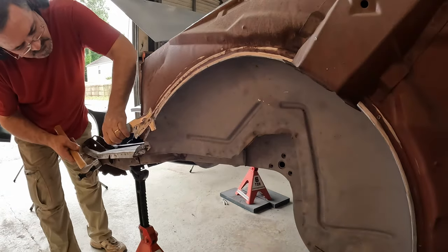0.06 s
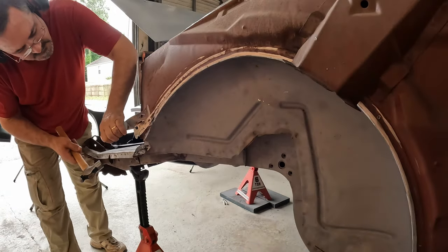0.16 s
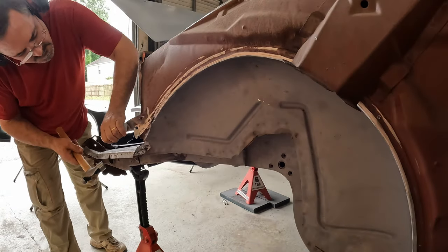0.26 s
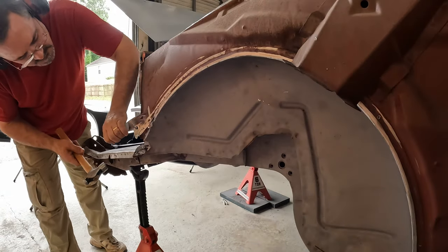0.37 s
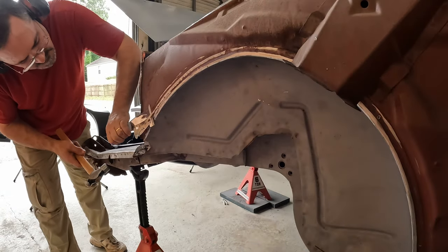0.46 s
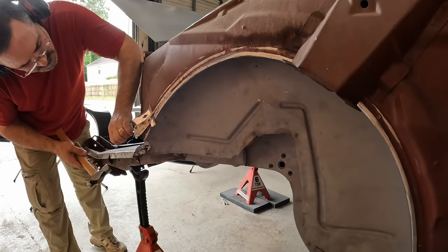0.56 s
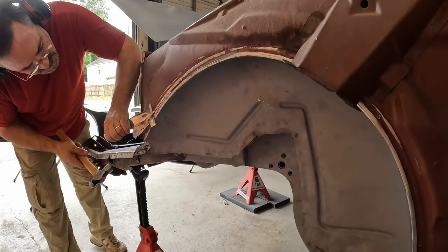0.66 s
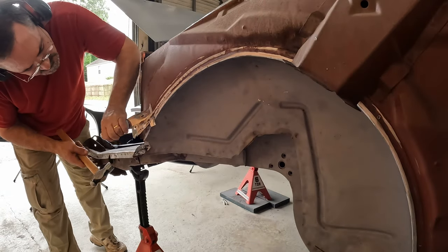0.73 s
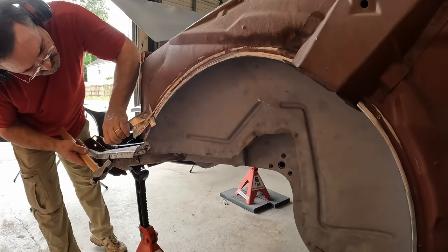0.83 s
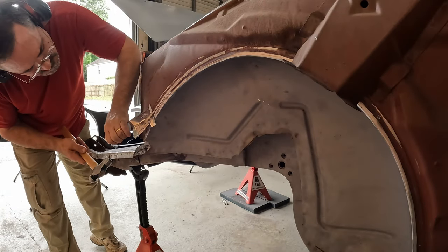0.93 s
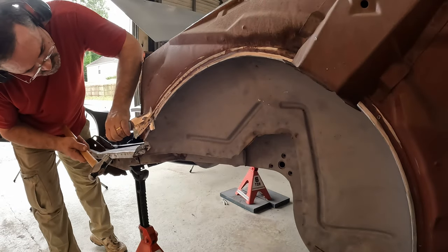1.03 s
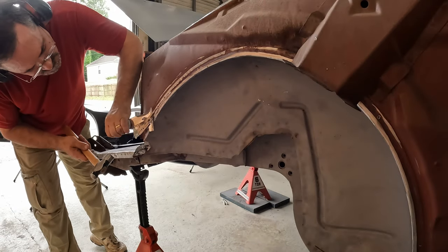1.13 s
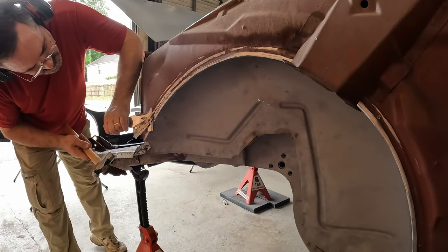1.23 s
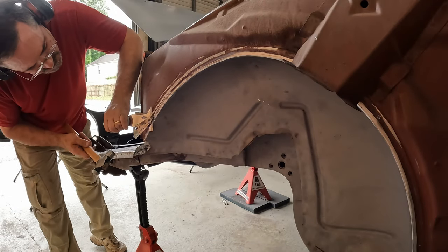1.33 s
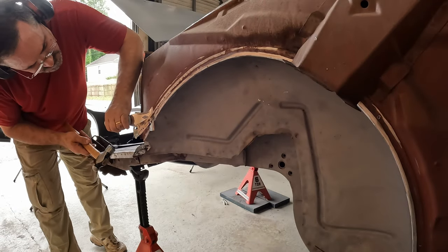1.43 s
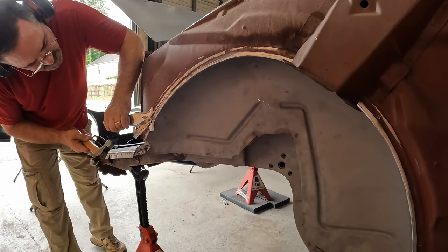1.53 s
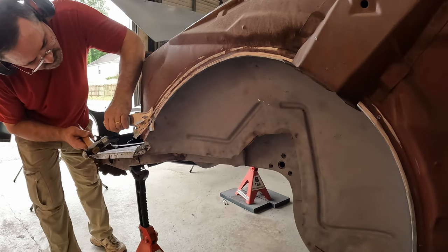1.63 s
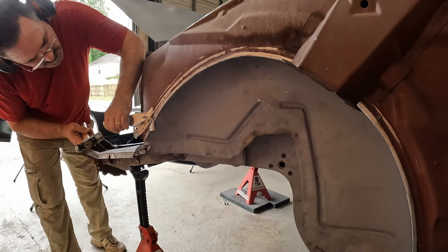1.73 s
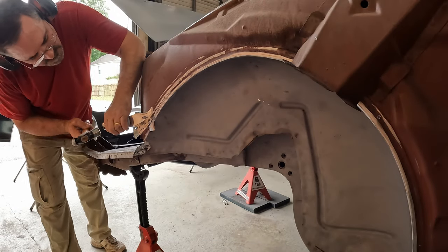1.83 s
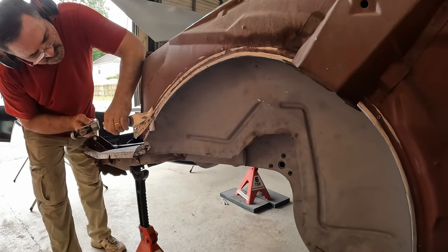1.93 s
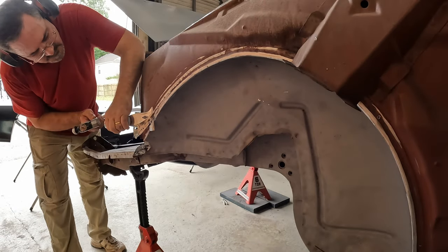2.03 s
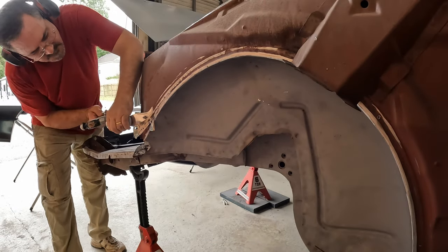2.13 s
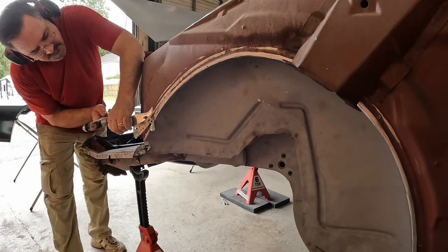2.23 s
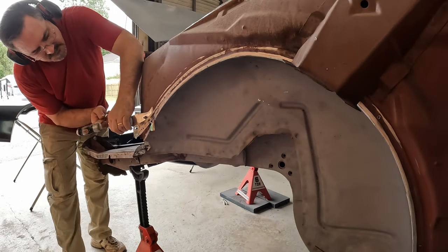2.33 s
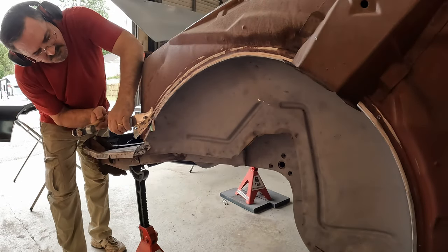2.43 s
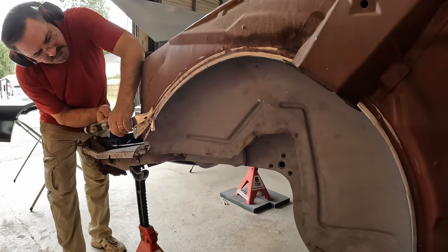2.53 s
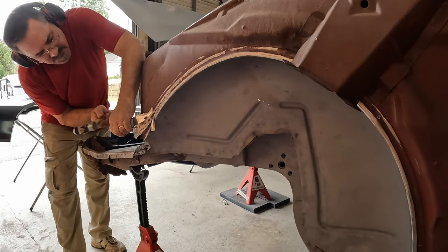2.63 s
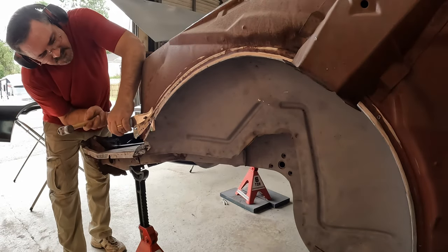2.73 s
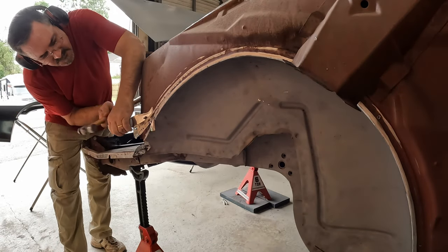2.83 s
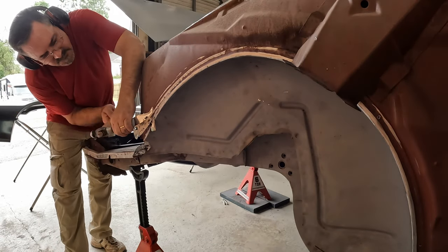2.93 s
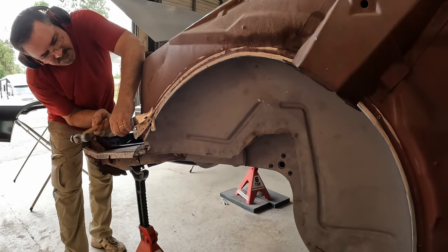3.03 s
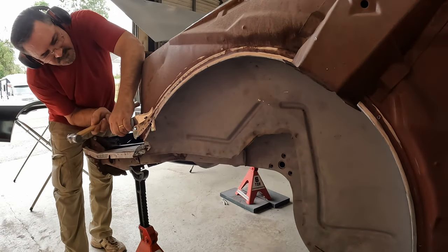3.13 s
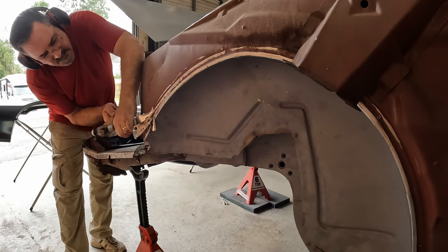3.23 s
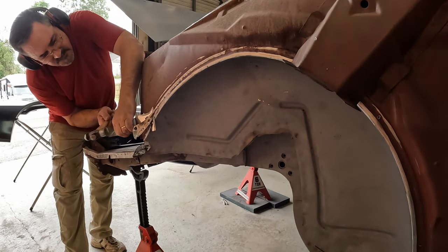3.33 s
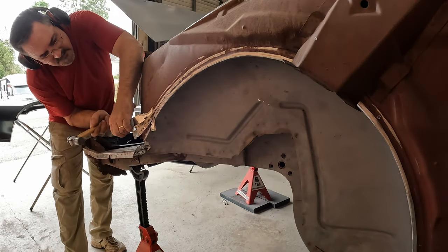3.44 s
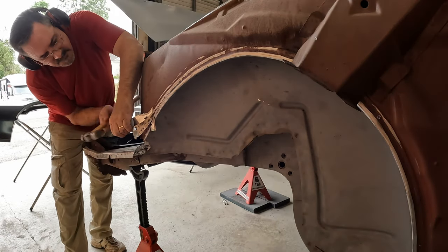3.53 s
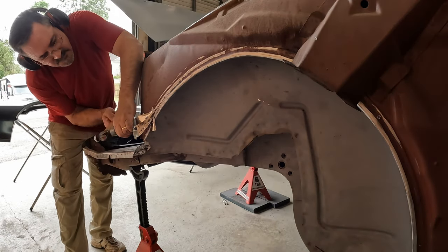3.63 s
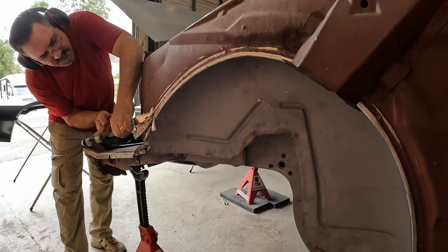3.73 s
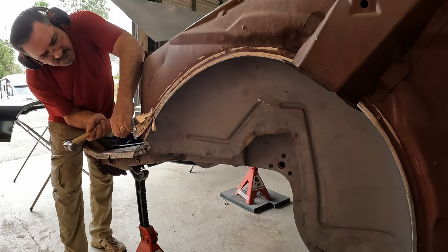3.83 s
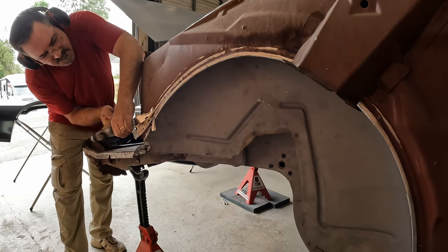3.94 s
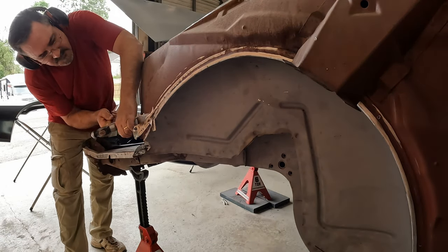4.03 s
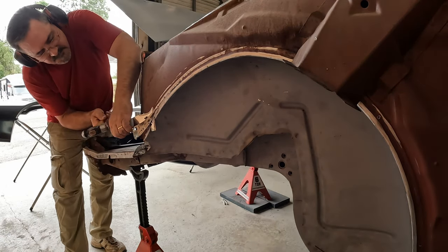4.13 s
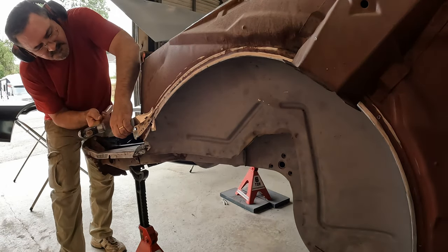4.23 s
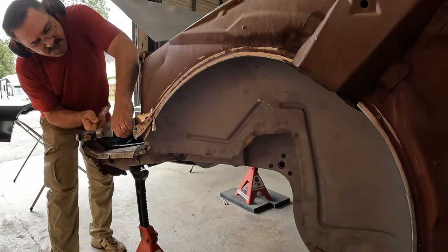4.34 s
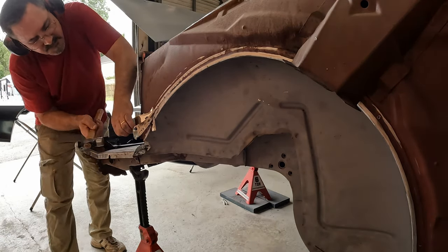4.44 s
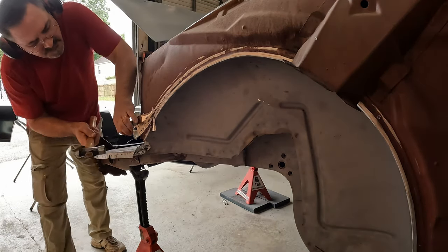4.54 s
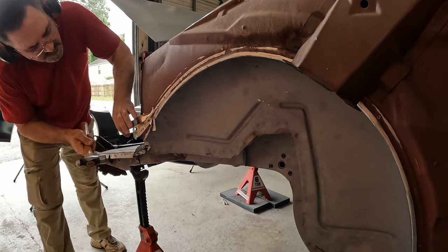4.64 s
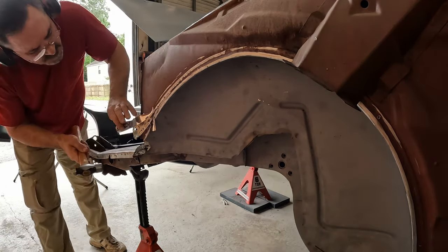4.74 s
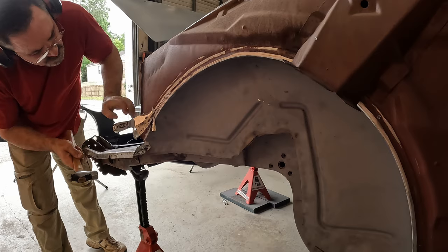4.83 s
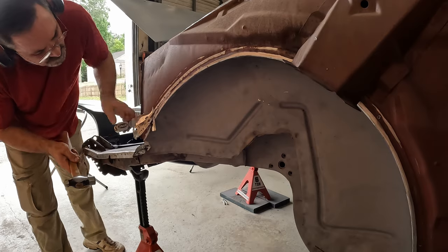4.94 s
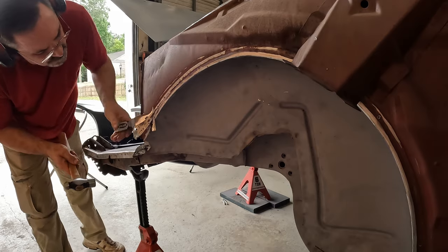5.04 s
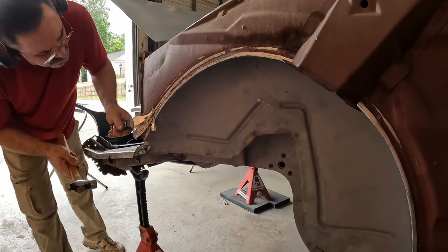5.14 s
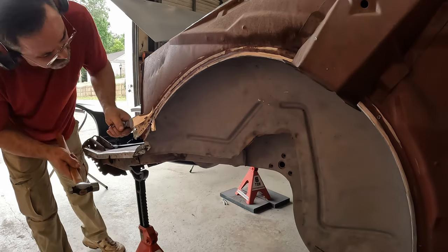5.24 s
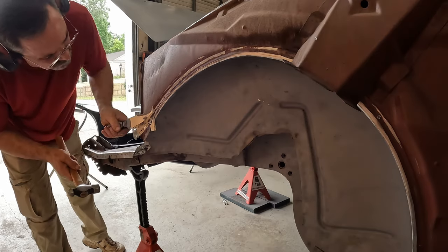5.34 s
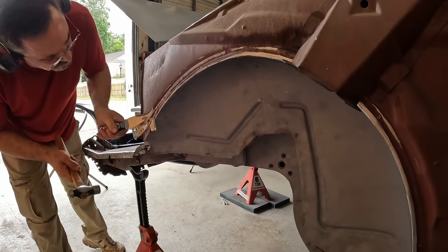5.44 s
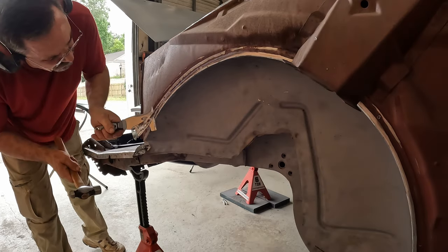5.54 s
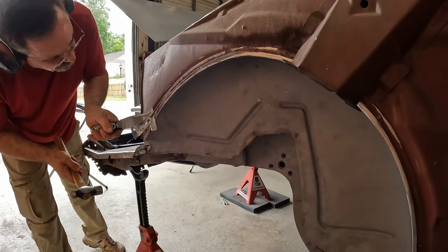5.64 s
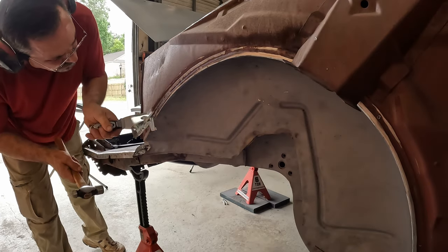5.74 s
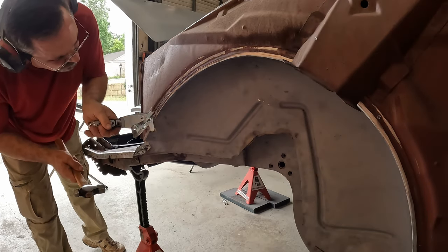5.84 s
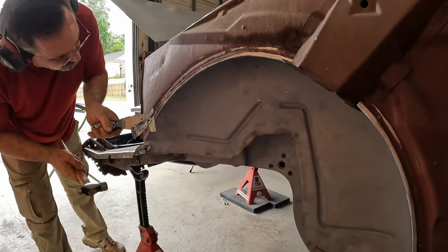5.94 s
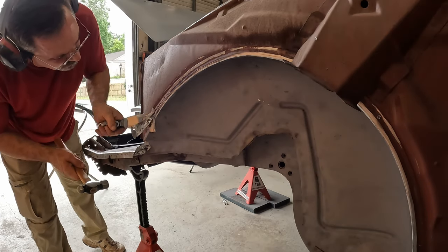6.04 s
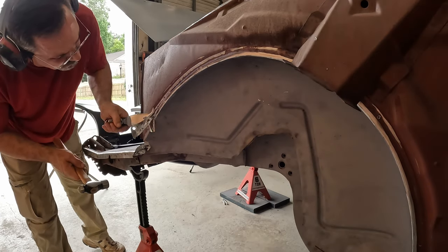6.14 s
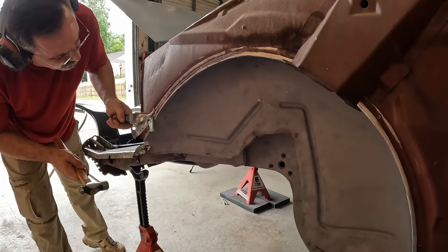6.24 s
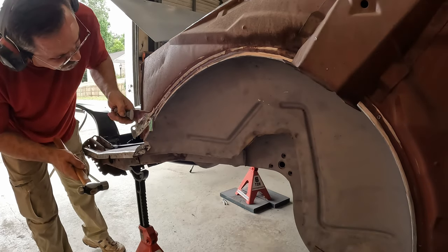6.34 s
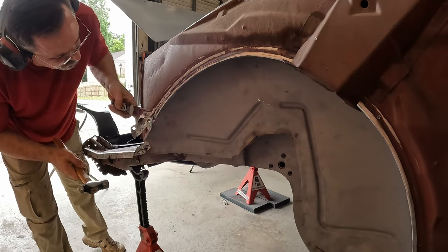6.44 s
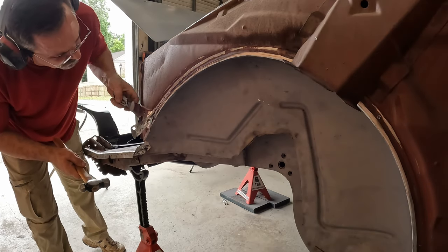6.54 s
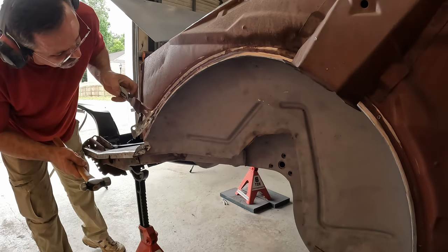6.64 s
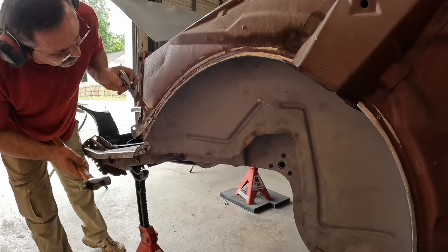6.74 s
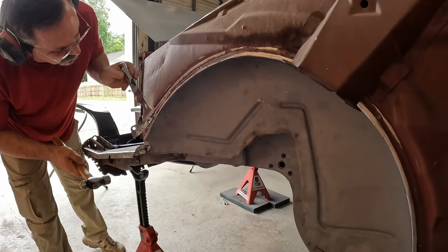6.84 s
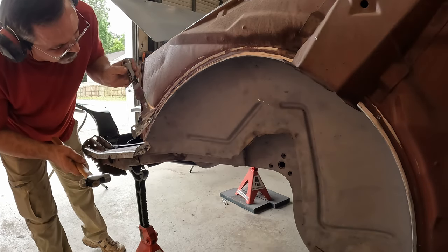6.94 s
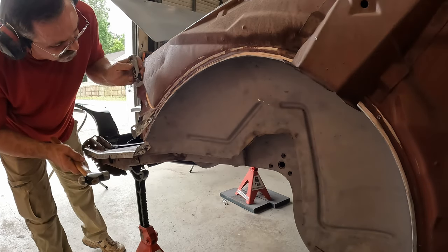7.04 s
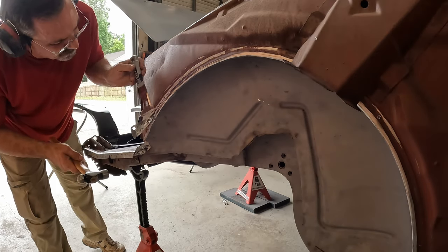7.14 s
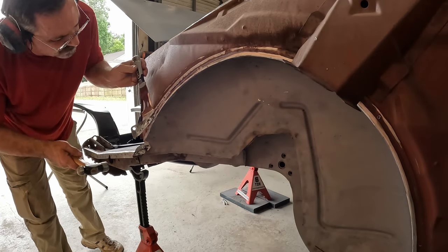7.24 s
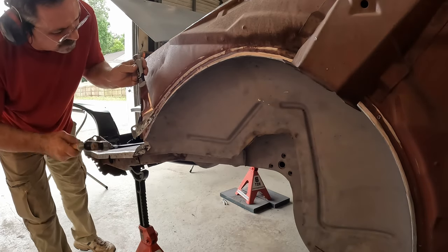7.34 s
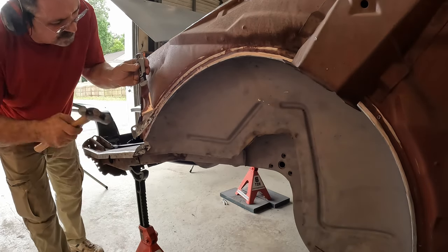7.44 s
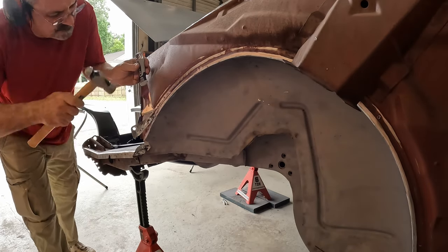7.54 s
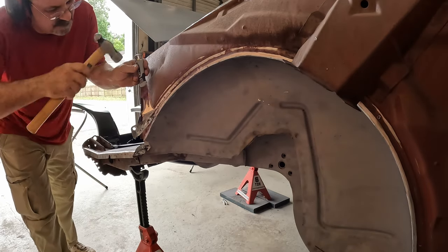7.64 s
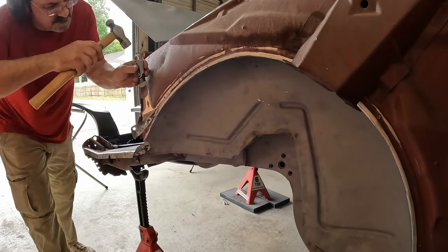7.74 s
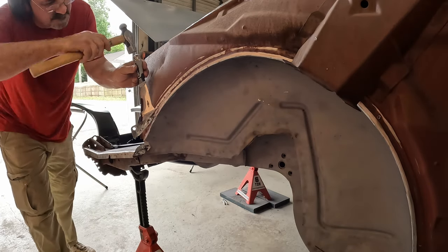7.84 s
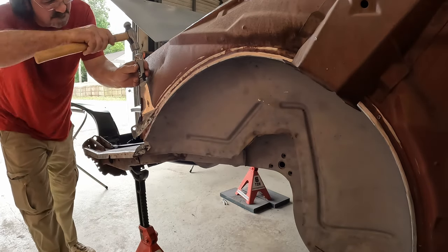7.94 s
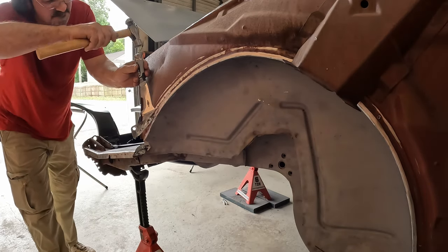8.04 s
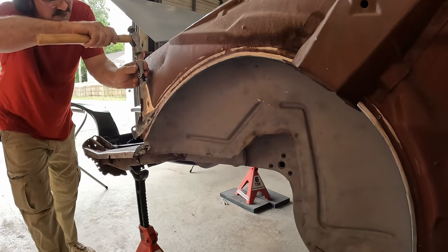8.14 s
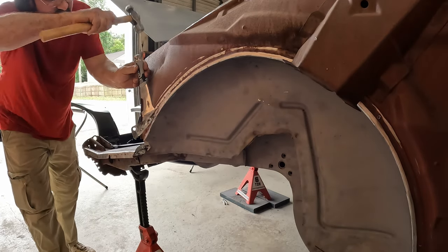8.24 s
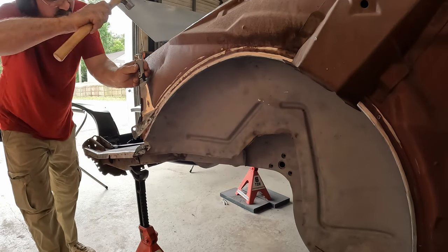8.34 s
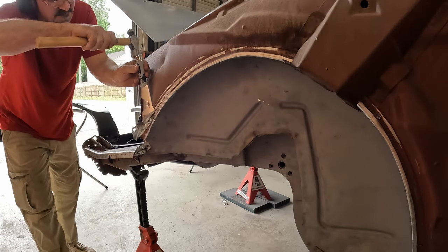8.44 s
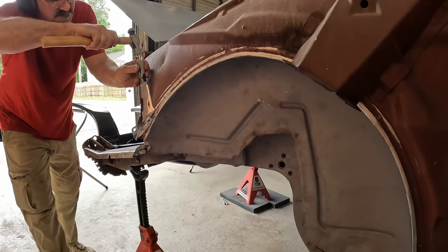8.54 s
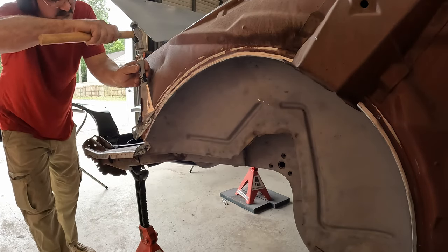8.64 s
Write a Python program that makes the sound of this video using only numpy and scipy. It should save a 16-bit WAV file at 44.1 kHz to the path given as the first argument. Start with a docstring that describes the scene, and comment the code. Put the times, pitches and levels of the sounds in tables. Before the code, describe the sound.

A chisel scrapes and taps in a steel car body seam, then hammer blows clang and boom through the hollow shell in an open garage.

```python
"""A chisel scrapes and taps in a spot-welded seam of a steel car body, over a low hum in an open garage.
A far bird chirps; then a hammer drives the chisel in two runs of blows, with more rubbing between them.
Rubbing and rattling are stick-slip noise through flange resonances; taps are contact noise with short rings.
A blow adds a crack, clear rings and dense shell modes that decay at a speed set by their frequency.
A slow and a fast gain control duck under loud sound; the slow one creeps back over seconds."""
import sys
import numpy as np
from scipy import signal
from scipy.fft import rfft, irfft, next_fast_len
from scipy.io import wavfile
from scipy.ndimage import map_coordinates

SR = 44100
rng = np.random.default_rng(int(sys.argv[2]) if len(sys.argv) > 2 else 0)


def unload_audio(sound):
    """Save the sound as a 16-bit wav file, at the path given as the first command line argument."""
    columns = np.transpose(np.atleast_2d(sound))
    # keep every value between -1 and 1, then stretch to whole-number steps
    steps = np.round(np.clip(columns, -1, 1) * 32767)
    wavfile.write(sys.argv[1], SR, steps.astype(np.int16))


N = 382788  # length in samples

# All levels in the tables are those ahead of the gain control.
# Spectrum of the outdoor air noise. Each row: frequency in Hz, relative level in dB per Hz.
AIR_SPECTRUM = [(15, -53.5), (25, -46), (127, -2), (231, 0.5), (331, -6), (569, -9), (930, -16.5),
                (3560, -23), (5820, -30.5), (9030, -50.5), (12000, -49.5), (15600, -98.5), (22000, -120)]
# Low hums. Each row: frequency in Hz, half-width in Hz, level in dB.
HUMS = [(231, 4.1, -48.5), (291, 9.2, -56.5)]
# Swelling background. Each row: time in seconds, rumble level in dB, drone level in dB.
OUTSIDE_LEVELS = [(0, -51.5, -60), (1.002, -43.5, -55.5), (2, -51, -49.5), (4.5, -53, -49.5),
                  (5.5, -53.5, -50), (6.2, -47, -57.5), (6.8, -49.5, -46), (7.1, -48, -44.5),
                  (7.6, -48.5, -45), (8.1, -55, -49), (8.68, -46, -33)]
# Bird whistles. Each row: start in seconds, end in seconds, first pitch in Hz, last pitch in Hz, level in dB.
CHIRPS = [(0.165, 0.194, 3870, 3500, -46), (7.527, 7.586, 3600, 3160, -55.5),
          (8.008, 8.062, 3720, 3120, -51), (8.104, 8.177, 2854, 2140, -51)]

# Soft booms of the shell when leaned on. Each row: centre in seconds, level in dB, pitch in Hz,
# time scale of the swell in seconds.
NUDGES = [(0.295, -40, 201, 0.044), (1.528, -36, 200, .05), (6.127, -24.5, 257, 0.06),
          (6.87, -29.5, 218, 0.12), (7.367, -30.5, 200, 0.046)]
# Squeals of the binding blade. Each row: centre in seconds, level in dB, time scale of the swell in seconds.
SQUEAKS = [(6.607, -51.5, .04), (6.674, -38.5, .01), (6.692, -42, .015), (6.766, -38, .012),
           (6.812, -32, .015), (0.31, -23.5, 0.041)]
# Partials of the squeal. Each row: frequency in Hz, level in dB.
SQUEAL_PARTIALS = [(1037, 8.5), (2065, 9.5)]
# Bright rasps of the blade over rust. Each row: start in seconds, level in dB, rise time scale in seconds,
# t60 in seconds.
RASPS = [(2.41, -7, .07, 0.291), (5.05, -36, 0.0107, 0.12), (7.637, -20.5, 0.0232, 0.28),
         (7.836, -37.5, 0.0026, 0.062), (7.86, -40, 0.0038, 0.037), (7.881, -40.5, 0.00174, 0.083)]
# Spectrum of the rasped rust. Each row: frequency in Hz, relative level in dB per Hz.
RUST_SPECTRUM = [(900, -23.5), (2300, -5.5), (2900, -1.5), (4200, -4.5), (5500, -10), (8000, -26),
                 (12000, -37.5), (16000, -57)]

# Strokes of the chisel rubbing in the seam. Each row: start in seconds, rise in seconds, hold in seconds,
# sheet drone level in dB, flange ring in dB above the drone, grit in dB above the drone.
STROKES = [(0.0, 0.0083, 0.0067, -33, -2, -6.5), (0.198, 0.024, 0.051, -35.5, -7.5, -6),
           (0.241, .025, 0.054, -17, 1.5, -2.5), (0.411, .05, 0.061, -21.5, -2.5, -15),
           (0.536, 0.051, 0.016, -26, 0, -11), (0.663, .008, 0.012, -26.5, 9, 6),
           (0.914, 0.0035, .02, -35.5, -4.5, -15), (1.051, .03, 0.035, -28.5, -9.5, -14.5),
           (1.129, 0.008, 0.013, -38, 5, 9), (1.21, .008, .02, -38.5, 6, -6.5),
           (1.471, 0.021, 0.016, -25.5, 3.5, -7), (2.061, .005, .02, -48.5, 6, -17),
           (2.136, 0.0046, .02, -57, -6.5, 11), (5.48, 0.051, .04, -43.5, -7, -15),
           (5.66, 0.027, .15, -57, 4, -5), (5.888, .03, 0.047, -35.5, -17, -14),
           (6.016, 0.038, 0.067, -24, -13.5, -21.5), (6.365, 0.0096, .1, -34, -15.5, -21),
           (6.451, 0.21, .05, -34.5, -4.5, -8), (6.75, .012, 0.027, -33, 2, 1.5),
           (6.801, 0.026, 0.022, -27.5, 5.5, -9), (7.267, 0.0076, .03, -40.5, -3.5, -10),
           (7.306, 0.017, .01, -33.5, -8, -3.5), (7.626, 0.0091, .02, -50, 8, 3),
           (8.202, 0.025, .01, -44, 7, -4)]
RISE_DB = 15.5  # a stroke climbs this far during its rise
# drone, ring and grit in seconds: the deeper the layer, the later it starts and the longer its t60
LAG_S, RELEASE_S = [0.026, 0.0036, 0.0011], [0.8, 0.5, 0.36]
QUICK_S, RING_ON_DB = 0.25, -5  # t60 of the fast part of a stroke's end; share that rings on
# Rattles as the chisel jumps back after a blow. Each row: centre in seconds, level in dB,
# time scale of the swell in seconds.
REBOUNDS = [(2.488, -29, 0.036), (2.797, -27.5, 0.059), (3.173, -15.5, 0.1016), (3.547, -19.5, 0.069),
            (3.876, -20.5, 0.1), (4.25, -18, 0.068), (8.391, -27.5, 0.045)]
# Small taps of the chisel edge. Each row: start in seconds, level in dB, ring in dB above it,
# second ring pitch in Hz, glint in dB above the level.
TAPS = [(0.015, -27, -18, 2100, -36), (0.248, -14.5, -9, 2506, -45), (0.268, -23, 10, 1930, -44),
        (0.669, -19, 5, 2090, -43.5), (0.914, -36.5, 9, 825, -40), (1.14, -24, 6.5, 2397, -16),
        (1.233, -24.5, 4.5, 958, -43.5), (1.5, -21.5, -9, 2375, -37), (2.068, -37.5, 2.5, 2450, -42),
        (2.132, -17, -13, 3174, -22.5), (4.892, -37, -5.5, 1990, -43.5), (6.062, -33, 1, 2116, -39),
        (6.752, -20.5, -4, 1970, -35), (6.812, -20, 1.2, 1514, -45), (7.276, -41, -0.5, 2110, -50),
        (7.326, -26, -14, 3156, -22), (7.639, -24.5, -3, 3880, -49)]
BLADE_HZ, BLADE_DB = 1016, -4.2  # a ring of the blade common to all taps, dB over the second ring
# Faint ticks heard only as a glint. Each row: start in seconds, level in dB.
TINKLES = [(.135, -68.5), (.214, -50), (.838, -49.5), (.98, -60), (1.03, -59), (1.043, -56.5),
           (1.058, -40.5), (1.985, -75)]
# Spectrum of the rubbed seam. Each row: frequency in Hz, relative level in dB per Hz.
EDGE_SPECTRUM = [(88, -62.5), (150, -10.5), (341, -4), (391, 3.5), (649, -2.5), (998, -2.5), (1340, -13.5),
                 (2060, -14), (4580, -21), (6770, -33.5), (8900, -51.5), (11000, -34), (16000, -90)]
# Modes of the loose flange. Each row: frequency in Hz, width in Hz, level in dB.
FLANGE_MODES = [(236.5, 75, 12), (393, 22, 5.5), (455, 38, 8.5), (965, 10, 2.5), (1011, 4.6, 5.5),
                (1223, 16, 6.5), (1460, 9, 13.5), (1550, 23, 14.5), (2026, 68, 2.5), (2207, 31, 1.5),
                (2505, 89, 5.5), (3185, 51, 4), (3479, 160, 3.5), (3740, 29, 3.5)]
# Contact noise of steel on steel. Each row: frequency in Hz, relative level in dB.
CLICK_SPECTRUM = [(200, -31), (800, 2.5), (2500, 6.5), (7000, -5), (9000, -23), (11000, -17),
                  (16000, -58.5)]
GLINT_HZ = 10300  # highest modes of the tool steel

# Hammer blows. Each row: start in seconds, strength in dB, brightness in dB, chisel ring pitch in Hz,
# chisel ring level in dB, loudest panel pitch in Hz, lift of that panel in dB, thud of the frame in dB.
BLOWS = [(2.2830, -21, 1, 2387, -7, 1160, 8, -12), (2.6768, -13, 2.5, 2070, -5, 2023, 2.5, 5.5),
         (3.0140, 1.5, -1.5, 3904, -9.5, 3300, 0.5, 7), (3.349, 2.5, -3, 2032, -16, 610, 2, -0.5),
         (3.708, 1, -3.5, 2000, -7.5, 1355, 5.5, -1.5), (4.0920, -0.03, -2.6, 2093, -8, 1170, 3.5, -2.5),
         (8.2323, -16, 3.5, 1390, -14, 1425, 12, 15), (8.5849, -2, 1, 2720, -48.5, 1150, -4, 6.5)]
# Spectrum of the struck body shell. Each row: frequency in Hz, relative level in dB per Hz.
BODY_SPECTRUM = [(35, -70.5), (60, -39.5), (262, -1), (308, -16), (469, -4), (636, -9.5), (1140, -13),
                 (1820, -15.5), (3340, -20.5), (8920, -45), (10800, -52.5), (13300, -66.5), (16000, -116)]
# Modes of the shell. Each row: frequency in Hz, width in Hz, level in dB over the dense ringing.
SHELL_MODES = [(194.8, 130, 4.5), (138, 12, 5), (232, 7.3, 11), (259.7, 6.7, 7.5), (343.8, 29, 6.5),
               (401.7, 5.6, 5), (463.1, 12, 6.5), (515.3, 29, 3), (694, 31, 4.5), (821, 25, 3.5),
               (876.5, 91, 3), (957, 55, 2.5), (1090, 26, 1.5), (1145.5, 15, 9), (1290, 13, 6),
               (2065, 40, 4), (2680, 99, 3.5)]
# Decay of the dense ringing. Each row: frequency in Hz, t60 in seconds.
FADE = [(100, 1.1), (250, 1.043), (600, 0.976), (1500, 0.79), (4000, 0.982), (10000, 0.97)]
# The boom takes time to spread through the shell. Each row: frequency in Hz, rise time constant in seconds.
SWELL = [(150, 0.0075), (500, 0.0061), (2000, 0.0032)]
SHELL_DB, CONTACT_DB = 19.5, 13  # over the strength of the blow
FLANGE_DB = -37.5  # the loose flange is excited to the same level by every blow
CRACK_DB, CRACK_GROWS = 11.5, 0.96  # sharp crack at strength 0, dB per dB of strength
GLINT_DB, GLINT_GROWS = -40.5, 0.96  # fizz of the tool steel, likewise
SIZZLE_GROWS = -0.2  # a blow that thuds in the frame sizzles less: dB per dB of thud
PANEL_RING_DB, PANEL_RING_S = -9, .35  # clear ring of the loudest panel: over strength and brightness, t60
# two main low shell modes ring clearly and beat: dB over the strength, t60, limits in Hz
BOOM_DB, BOOM_S, BOOM_HZ = -15, 1.07, (210, 300)

# Microphone port resonance: centre in Hz, width scale in Hz, depth in dB.
PORT_NOTCH = (9100, 260, -16)
TOP_HZ = 16300  # upper band limit


def amp(db):
    """Decibels to amplitude ratio."""
    return 10 ** (np.asarray(db) / 20)


def unit(x):
    """Normalization to an rms of 1."""
    return x / np.sqrt(np.mean(x ** 2) + 1e-20)


def along(points, hz):
    """Interpolation of (Hz, value) points on a logarithmic frequency axis."""
    f, v = np.transpose(points)
    return np.interp(np.log(hz + 1), np.log(f + 1), v)


def wobble(rate):
    """Slow random modulation: a smooth curve through random knots, rate knots a second."""
    knots = rng.standard_normal(int(N * rate / SR) + 4)
    return map_coordinates(knots, [np.arange(N) * rate / SR])


def filtered(x, response):
    """Linear filtering: the spectrum of x times a complex response of frequency."""
    m = next_fast_len(len(x) + 8192)
    return irfft(rfft(x, m) * response(np.fft.rfftfreq(m, 1 / SR)), m)[:len(x)]


def narrow(hz, width_hz):
    """Narrow-band noise: a fuzzy tone of rms 1."""
    return unit(filtered(rng.standard_normal(N), lambda f: 1 / (1 + ((f - hz) / width_hz) ** 2)))


def modes(table):
    """Modal superposition: causal resonances standing on a flat response."""
    return lambda f: 1 + sum((amp(db) - 1) * 1j * f * w / (c * c - f * f + 1j * f * w)
                             for c, w, db in table)


def bands(hz, low_hz, high_hz):
    """Band splitting: low, middle and high shares of each frequency."""
    low = 1 / (1 + (hz / low_hz) ** 4)
    high = 1 / (1 + (high_hz / (hz + 1)) ** 4)
    return low, 1 - low - high, high


def add(track, s, x):
    """Superposition: mix x into track at time s in seconds."""
    part = track[round(s * SR):][:len(x)]
    part += x[:len(part)]


def swells(events, t):
    """Gradual excitation: the sum of Gaussian swells (centre s, dB, time scale s)."""
    return sum(amp(db) * np.exp(-((t - s) / length) ** 2) for s, db, length in events)


def rough_tone(hz, t, rough):
    """Phase diffusion: a sine whose phase wanders by a random step (radians) each sample."""
    return np.sin(2 * np.pi * hz * t + np.cumsum(rng.normal(0, rough, len(t))))


def garage():
    """Ambient noise: outdoor air through the open door, a swelling rumble and drone, and fuzzy low hums."""
    s, rumble_db, drone_db = np.transpose(OUTSIDE_LEVELS)
    t = np.arange(N) / SR
    noise = unit(filtered(rng.standard_normal(N), lambda hz: amp(along(AIR_SPECTRUM, hz))))
    air = amp(-43.5 + wobble(1.2)) * noise
    rumble = amp(np.interp(t, s, rumble_db)) * narrow(96, 45)
    drone_phase = 2 * np.pi * np.cumsum(140 + 3 * wobble(5)) / SR
    drone = amp(np.interp(t, s, drone_db)) * np.sqrt(2) * np.sin(drone_phase)
    hums = sum(amp(db) * narrow(hz, w) for hz, w, db in HUMS)
    return air + rumble + drone + hums


def bird():
    """Frequency modulation: short falling whistles from outside, their pitch jittered as if blurred by distance."""
    out = np.zeros(N)
    for start, end, from_hz, to_hz, db in CHIRPS:
        u = np.linspace(0, 1, round((end - start) * SR))
        pitch = from_hz + (to_hz - from_hz) * u + rng.normal(0, 330, len(u))
        whistle = np.sin(2 * np.pi * np.cumsum(pitch) / SR)
        add(out, start, amp(db) * np.sin(np.pi * u) * whistle)
    return out


def walls(x, t60):
    """Diffuse reverberation: convolution with exponentially decaying noise of unit energy."""
    t = np.arange(SR // 2) / SR
    tail = rng.standard_normal(len(t)) * amp(-60 * t / t60) * (1 - np.exp(-t / 0.0028))
    return signal.fftconvolve(x, tail / np.linalg.norm(tail))[:N]


def nudges():
    """Slow excitation of low shell modes: soft booms with no attack."""
    t = np.arange(N) / SR
    return sum(swells([(s, db, length)], t) * narrow(hz, 18) for s, db, hz, length in NUDGES)


def squeaks():
    """Frictional squeal: rough partials that swell while the blade binds."""
    bind = swells(SQUEAKS, np.arange(N) / SR)
    return bind * sum(amp(db) * narrow(hz, 35) for hz, db in SQUEAL_PARTIALS)


def friction():
    """Stick-slip force: gritty noise in uneven bursts."""
    return rng.standard_normal(N) * amp(1.3 * wobble(60) + 1.7 * wobble(500))


def sheet(count, width_hz, peak_db):
    """Modal density of thin steel: a random comb of close modes whose peaks widen with pitch."""
    hz = np.sort(rng.uniform(500, 9046, count))
    grid = np.arange(400, 9400, 4.)
    widths = width_hz * (hz / 1000) ** 0.32
    bumps = np.exp(-((grid[:, None] - hz) / widths) ** 2) @ rng.uniform(0.13, 1, count)
    # tanh limits overlapping peaks; the offset lets the comb cut as well as lift
    return lambda f: amp(peak_db * (np.interp(f, grid, np.tanh(bumps)) - 0.3373) * (f > 500))


def rasps():
    """Friction on rust: dense bright grit that swells quickly and dies away."""
    envelope = np.zeros(N)
    t = np.arange(SR // 3) / SR
    for s, db, rise, t60 in RASPS:
        add(envelope, s, amp(db - 60 * t / t60) * (1 - np.exp(-(t / rise) ** 2)))
    comb = sheet(count=120, width_hz=20, peak_db=3)
    return envelope * unit(filtered(friction(), lambda hz: amp(along(RUST_SPECTRUM, hz)) * comb(hz)))


def click(t60, rings, ring_t60, rough=.055):
    """Impact of steel on steel: a burst of contact noise and short rough rings (Hz, dB)."""
    t = np.arange(SR // 3) / SR
    burst = unit(filtered(rng.standard_normal(len(t)), lambda hz: amp(along(CLICK_SPECTRUM, hz))))
    out = .5 * burst * amp(-60 * t / t60)
    for hz, db in rings:
        out += amp(db - 60 * t / ring_t60) * rough_tone(hz, t, rough)
    return (1 - np.exp(-t / .00025)) * out


def glint(t60):
    """High-frequency modal decay: a short fizz of the tool steel's highest modes."""
    t = np.arange(SR // 3) / SR
    fizz = filtered(rng.standard_normal(len(t)), lambda hz: np.exp(-((hz - GLINT_HZ) / 1500) ** 2))
    return unit(fizz) * amp(-60 * t / t60)


def stroke(t, rise, hold, t60):
    """Two-stage decay: the gain of a stroke rises, holds, falls quickly and rings on longer."""
    after = np.maximum(t - rise - hold, 0)
    share = min(amp(RING_ON_DB), 1)
    fall = share * amp(-60 * after / t60) + (1 - share) * amp(-60 * after / QUICK_S)
    return (t >= 0) * amp(-RISE_DB * np.clip(1 - t / rise, 0, 1)) * fall


def chisel():
    """Forced resonance: rubbing and rattling drive the flange modes, which ring on briefly; taps click on top."""
    t = np.arange(N) / SR
    force, comb = friction(), sheet(count=120, width_hz=30.8, peak_db=12.0)
    pressure = np.zeros((3, N))  # drone, ring and grit
    for s, rise, hold, db, ring_db, grit_db in STROKES:
        for layer, above_db, lag, t60 in zip(pressure, (0, ring_db, grit_db), LAG_S, RELEASE_S):
            add(layer, s, amp(db + above_db) * stroke(t[:SR] - lag, rise, hold, t60))
    pressure += amp([[-6], [-3], [-4]]) * swells(REBOUNDS, t)

    hz = np.fft.rfftfreq(4 * 8192, 1 / SR)
    out = np.zeros(N)
    for k in range(3):
        def seam(f):
            """Response of the seam in one band: drone, ring or grit."""
            return amp(along(EDGE_SPECTRUM, f)) * modes(FLANGE_MODES)(f) * comb(f) * bands(f, 880, 2210)[k]
        out += filtered(force * pressure[k], seam) / np.sqrt(np.mean(np.abs(seam(hz)) ** 2))

    for s, db, ring_db, ring_hz, glint_db in TAPS:
        rings = [(BLADE_HZ, ring_db + BLADE_DB), (ring_hz, ring_db)]
        add(out, s, amp(db + glint_db) * glint(0.069))
        add(out, s, amp(db) * click(0.03, rings, 0.084))
    for s, db in TINKLES:
        add(out, s, amp(db) * glint(0.098))
    return out


def flange_ring(t60):
    """Free vibration: all modes of the loose flange, struck at new strengths."""
    t = np.arange(SR // 2) / SR
    return sum(amp(db + rng.normal(0, 3) - 60 * t / t60) * rough_tone(hz, t, .02)
               for hz, _, db in FLANGE_MODES)


def boom():
    """Beating: the main low shell modes as clear tones, at new strengths and phases."""
    t = np.arange(SR) / SR
    tones = sum(amp(db + rng.normal(0, 2.2)) * np.sin(2 * np.pi * (hz * t + rng.random()))
                for hz, _, db in SHELL_MODES if BOOM_HZ[0] < hz < BOOM_HZ[1])
    return tones * amp(-60 * t / BOOM_S) * (1 - np.exp(-t / 0.011))


def shell_ringing(bright_db, panel_hz, panel_db, thud_db):
    """Frequency-dependent damping: dense ringing of the shell as noise whose bands each die at their own speed."""
    hz, t, noise = signal.stft(rng.standard_normal(SR + SR // 2), SR, nperseg=512, noverlap=448)
    shares = np.array(bands(hz, 870, 3100))
    tilt = amp([0, bright_db, bright_db + SIZZLE_GROWS * thud_db]) @ shares
    panel_lift_db = panel_db / (1 + ((hz - panel_hz) / 250) ** 2)
    thud_lift_db = thud_db * bands(hz, 200, 1e5)[0]
    colour = amp(along(BODY_SPECTRUM, hz)) * tilt * amp(panel_lift_db + thud_lift_db)

    fade = amp(-60 * t / along(FADE, hz)[:, None])
    fade *= 1 - np.exp(-(t + 0.00096) / along(SWELL, hz)[:, None])
    fade *= 1 + amp(1.5 - 60 * t / 0.43)  # the struck spot clangs hardest at first
    ringing = signal.istft(noise * colour[:, None] * fade, SR, nperseg=512, noverlap=448)[1]
    # every blow wakes another set of the close modes
    ringing = filtered(ringing, sheet(count=80, width_hz=14.4, peak_db=7.0))
    return ringing * np.minimum(np.arange(len(ringing)) / 30, 1)


def hammer():
    """Impulsive excitation: each blow cracks, rings the chisel and sets the whole shell vibrating."""
    shell, cracks = np.zeros(N), np.zeros(N)
    for s, db, bright_db, ring_hz, ring_db, panel_hz, panel_db, thud_db in BLOWS:
        ringing = shell_ringing(bright_db, panel_hz, panel_db, thud_db)
        contact = click(0.024, [(ring_hz, ring_db)], 0.058)
        panel_ring = click(.001, [(panel_hz, 0)], PANEL_RING_S, rough=.025)
        add(shell, s + 0.00093, amp(db + SHELL_DB) * ringing)
        add(cracks, s, amp(db + bright_db + CONTACT_DB) * contact)
        add(cracks, s, amp(CRACK_DB + CRACK_GROWS * db) * click(0.0048, [], 1))
        add(cracks, s, amp(db + bright_db + PANEL_RING_DB) * panel_ring)
        add(cracks, s, amp(db + BOOM_DB) * boom())
        add(cracks, s + 0.0025, amp(FLANGE_DB) * flange_ring(.3))
        add(cracks, s, amp(GLINT_DB + GLINT_GROWS * db) * glint(0.39))
    # the shell's modes, without the deepest bass
    return filtered(shell, lambda hz: modes(SHELL_MODES)(hz) * (1 - bands(hz, 60, 1e5)[0])) + cracks


def scene():
    """Superposition of all sources; the quieter tool sounds also excite the garage's reverberation."""
    tool = chisel() + rasps() + nudges() + squeaks()
    reverb = amp(-9.5) * walls(tool, 0.16)
    return (garage() + bird() + tool + reverb + hammer())[None]


def ducking(x, window, limit_db, share, release_db):
    """Compression: cut in dB, a share of the level above the limit, let go at release_db per second."""
    keep = np.exp(-1 / (window * SR))
    level = 10 * np.log10(signal.lfilter([1 - keep], [1, -keep], x ** 2) + 1e-12)
    slope = release_db * np.arange(N) / SR
    # a running maximum on a rising slope gives instant onset and linear release
    return np.maximum.accumulate(share * np.maximum(level - limit_db, 0) + slope) - slope


def record(dry):
    """Transduction: port notch, bass cut, slow and fast gain control, soft clipping at full scale, band limit."""
    hz, width, db = PORT_NOTCH

    def microphone(f):
        """Response of the microphone: the port notch and the bass cut."""
        notch = amp(db * np.exp(-((f - hz) / width) ** 2))
        return notch / (1 + (32 / (f + 1)) ** 4)

    x = filtered(dry[0], microphone)
    x = x * amp(-ducking(x, 0.028, -21.5, 0.52, release_db=3.5))
    x = x * amp(-ducking(x, 0.0021, -10, 0.58, release_db=47.5))
    x = x / (1 + np.abs(x) ** 6) ** (1 / 6)
    return filtered(x, lambda f: f < TOP_HZ)[None]


dry = scene()
out = record(dry)
unload_audio(out)
```